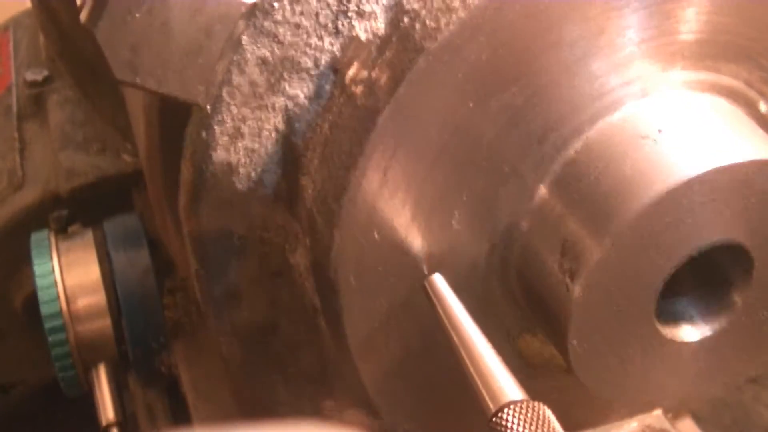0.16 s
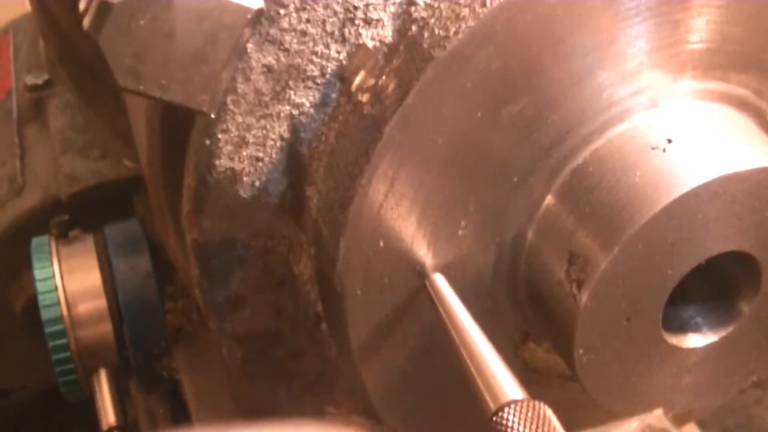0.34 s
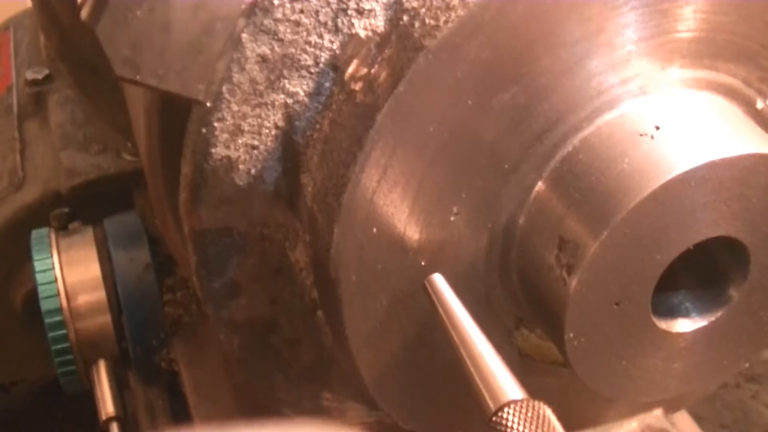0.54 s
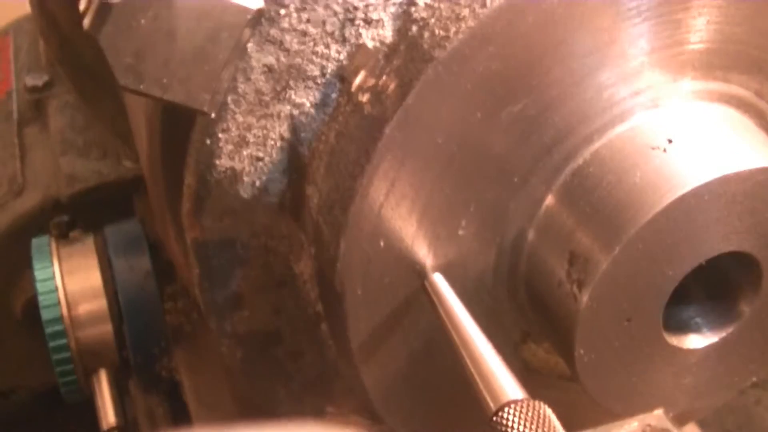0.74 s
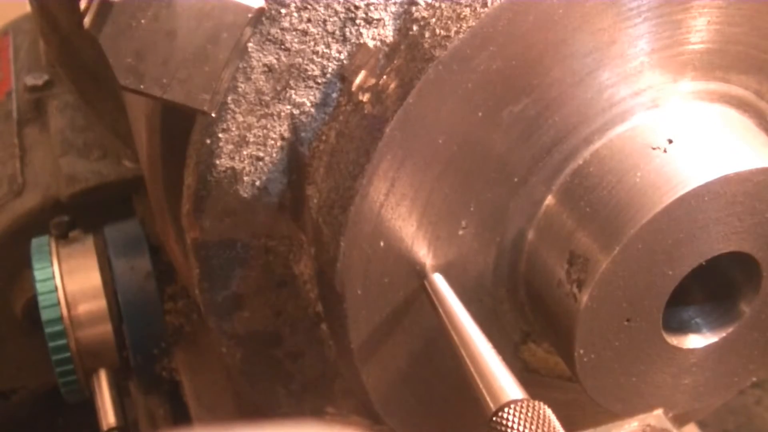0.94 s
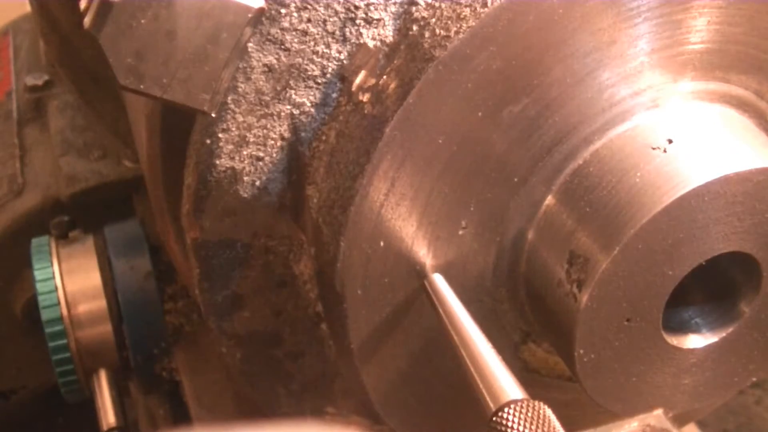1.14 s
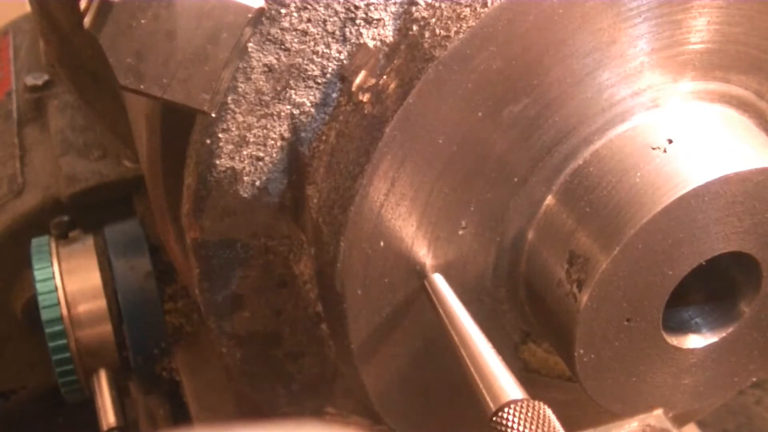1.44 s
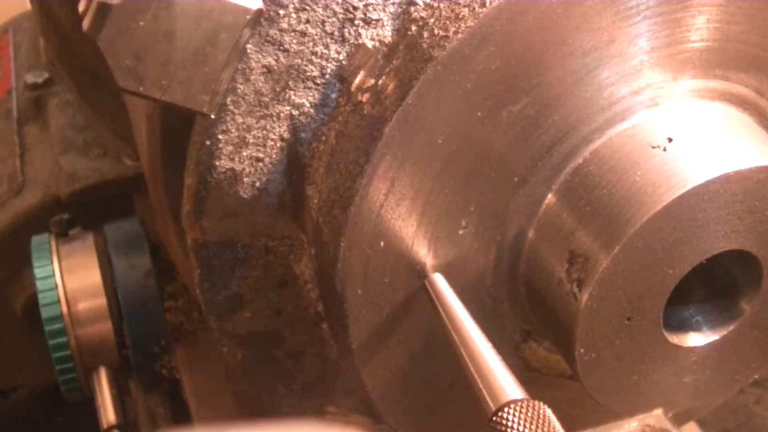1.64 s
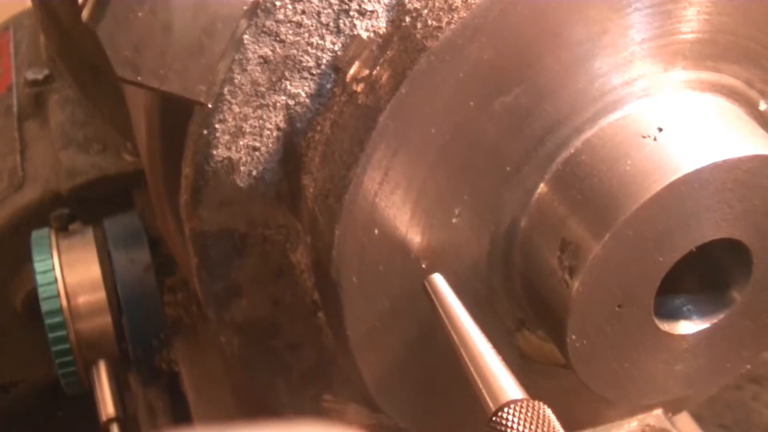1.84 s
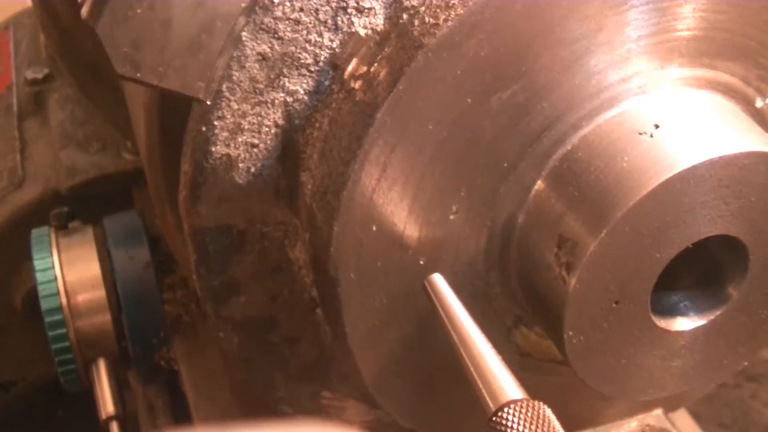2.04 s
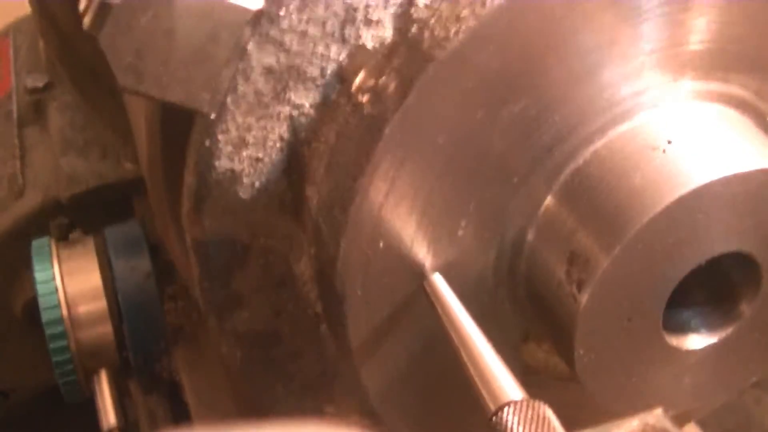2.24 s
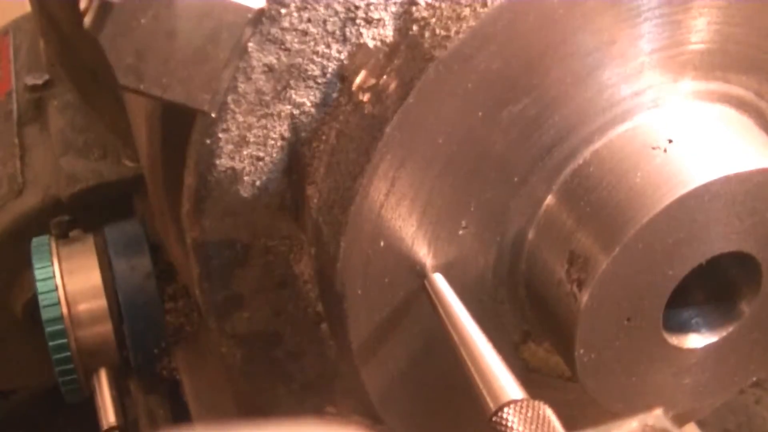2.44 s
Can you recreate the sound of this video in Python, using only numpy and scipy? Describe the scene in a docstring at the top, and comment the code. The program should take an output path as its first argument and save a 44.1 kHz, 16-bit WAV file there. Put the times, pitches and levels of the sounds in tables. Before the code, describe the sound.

Hammer blows on a centre punch set on a steel casting: two about half a second apart, a pause with faint scraping and one tiny clink, then a third; close microphone, small quiet workshop.

```python
"""In a small workshop a centre punch is set on a steel casting held in a machine and struck three times, close by.
The tip's touches are damped noise bursts and its scrape, like the hand's soft rustle, is grainy friction noise.
Each blow chatters as several cracks and modal rings; it thumps the machine, whose low modes swell into a boom.
Dry ticks, all alike, click close to the microphone as short modal rings; the tool clinks once between blows.
Reverberation surrounds the short sounds, and a steady coloured noise is the workshop's quiet air."""
import sys
import numpy as np
from scipy import signal
from scipy.fft import rfft, irfft, next_fast_len
from scipy.io import wavfile

SR = 44100
rng = np.random.default_rng(int(sys.argv[2]) if len(sys.argv) > 2 else 0)


def store_wav(level_fs):
    """Save 16-bit WAV to argv[1]."""
    pcm = np.round(np.clip(np.atleast_2d(level_fs), -1, 1) * 32767)
    wavfile.write(sys.argv[1], SR, pcm.T.astype(np.int16))


N = 114660  # length in samples
T = np.arange(SR // 2) / SR  # time axis of one short sound, in seconds


def amp(db):
    """Logarithmic level: decibels to amplitude gain."""
    return 10 ** (np.asarray(db) / 20)


def unit(x):
    """Normalisation: scale to an rms of 1."""
    return x / np.sqrt(np.mean(x ** 2) + 1e-20)


def fade(t60, t=T):
    """Exponential damping: the level falls by 60 dB in t60 seconds."""
    return np.exp(-np.log(1000) * t / t60)


def along(points, hz):
    """Spectral envelope: interpolate (Hz, value) points on a logarithmic frequency axis."""
    f, v = np.transpose(points)
    return np.interp(np.log(hz + 1), np.log(f + 1), v)


def filtered(x, response):
    """Linear filtering: multiply the zero-padded spectrum of x by a response of frequency."""
    n = x.shape[-1]
    padded = next_fast_len(n + 8192)
    spectrum = rfft(x, padded) * response(np.fft.rfftfreq(padded, 1 / SR))
    return irfft(spectrum, padded)[..., :n]


def noise(response, width, size):
    """Mid-side stereo: coloured noise of rms 1, whose side level sets the width at each frequency."""
    mid, side = filtered(rng.standard_normal((2, size)), response)
    side = filtered(side, lambda hz: amp(along(width, hz)))
    return unit(np.array([mid + side, mid - side]))


def add(track, s, sound):
    """Superposition: mix a sound in at s seconds."""
    i = max(0, round(s * SR))
    track[:, i:i + sound.shape[-1]] += sound[..., :N - i]


# Reverberation time of the workshop. Each row: frequency in Hz, t60 in seconds.
ROOM_T60 = [(60, 0.9), (150, 0.23), (400, 0.42), (1000, .31), (2500, 0.18), (5000, 0.17), (12000, 0.14)]
# Stereo width of the room's answer. Each row: frequency in Hz, side over mid in dB.
ROOM_WIDTH = [(100, -13.5), (300, -24), (1000, -12), (4500, -6), (9000, -3.5)]


def with_room(sound, wet_db):
    """Reverberation: convolve a short sound with noise that decays at its own rate in each band."""
    diffuse = noise(np.ones_like, ROOM_WIDTH, size=len(T))
    hz, t, bands = signal.stft(diffuse, SR, nperseg=256)
    decaying = bands * fade(along(ROOM_T60, hz)[:, None], t)
    tail = signal.istft(decaying, SR, nperseg=256)[1][:, :len(T)]
    tail = tail * (1 - np.exp(-T / 0.0017))  # soft onset
    tail = unit(tail) / np.sqrt(len(T))  # energy 1 in the mean of both channels
    answer = signal.fftconvolve(np.atleast_2d(sound), tail, axes=1)[:, :len(T)]
    return sound + amp(wet_db) * answer


# Spectrum of the air. Each row: frequency in Hz, relative level in dB.
AIR_SPECTRUM = [(15, -49), (25, -10), (119, -1), (209, -7), (722, -14.5), (826, -12), (1270, -16),
                (1570, -15), (1950, -16.5), (4260, -20), (15500, -29.5)]
# Stereo width of the air. Each row: frequency in Hz, side over mid in dB.
AIR_WIDTH = [(40, -12), (150, -4.5), (300, 2), (600, 3), (2000, -0.5), (5000, -2), (12000, -1.5)]
AIR_DB = -54


def quiet_air():
    """Stationary random noise: a fixed spectrum with no events."""
    return amp(AIR_DB) * noise(lambda hz: amp(along(AIR_SPECTRUM, hz)), AIR_WIDTH, size=N)


# The tip scraping and the hand shifting.
# Each row: start of the hold in seconds, length of the hold in seconds, level in dB,
# Gaussian fade scale at both ends in seconds.
RUBS = [(-.02, 0.02, -44.5, 0.058), (0.165, 0.11, -39, 0.0075), (0.423, 0.094, -46, 0.071),
        (0.658, 0.086, -40, 0.012), (1.072, 0.23, -60.5, 0.12), (1.712, 0.17, -48.5, 0.081),
        (2.193, 0.073, -36, 0.015), (2.552, .09, -50.5, 0.12)]
# Spectrum of the friction. Each row: frequency in Hz, relative level in dB.
RUB_SPECTRUM = [(30, 9), (120, -6), (280, 1.5), (520, -4.5), (900, -5), (2200, -6.5), (3600, -10.5),
                (4800, -12), (8000, -18.5), (15000, -34.5)]
# Stereo width of the friction. Each row: frequency in Hz, side over mid in dB.
RUB_WIDTH = [(100, -14), (600, -21), (2000, -8.5), (4500, -10), (9000, 0)]


def rubs(grain_db=2, grain_rate=400):
    """Sliding friction: noise with random grain, grain_rate points a second, fades in, holds and fades out."""
    t = np.arange(N) / SR
    level = np.zeros(N)
    for s, length, db, edge in RUBS:
        outside_hold = np.maximum(abs(t - s - length / 2) - length / 2, 0)
        level += amp(db) * np.exp(-(outside_hold / edge) ** 2)
    grain = np.interp(t * grain_rate, np.arange(N), rng.standard_normal(N))
    friction = noise(lambda hz: amp(along(RUB_SPECTRUM, hz)), RUB_WIDTH, size=N)
    return level * amp(grain_db * grain) * friction


# Jolts of the machine: three blows and a few nudges of the hand.
# Each row: start in seconds, thump level in dB, thump frequency in Hz, boom level in dB.
JOLTS = [(.008, -40.5, 139, -30.5), (.182, -28, 170, -28), (0.2326, 0, 195, 0), (0.4238, -21, 195, -19.5),
         (0.7296, -5.5, 183.6, -1.5), (1.739, -36, 203, -37), (2.198, -20, 196, -19),
         (2.242, -1.5, 179, 1.5), (2.545, -33.5, 198, -23)]
# Low modes of the machine and its stand.
# Each row: frequency in Hz, relative level in dB, t60 in seconds, rise time in seconds.
MACHINE_MODES = [(82.3, -39, 0.44, .02), (122.8, 4, 0.2, .07), (180.6, -18, 0.26, 0.015),
                 (235, -24, 0.11, 0.0032), (259.6, -28.5, 0.44, 0.015), (290, -20.5, 0.12, 0.0027),
                 (332, -25.5, 0.2, 0.023), (385.5, -26, 0.19, 0.0028)]
THUMP_WIDTH_S, THUMP_ROOM_DB = 0.0025, -8.5
BOOM_SWELL = 3.5  # steepness with which the low modes build up


def thumps():
    """Impulse and resonance: each jolt shoves the machine once and leaves its low modes booming."""
    out = np.zeros((2, N))
    lead_s = 3 * THUMP_WIDTH_S  # the push peaks this long after its first sample
    boom = np.zeros(len(T))
    for f, level, t60, rise in MACHINE_MODES:
        swell = 1 - np.exp(-(T / rise) ** BOOM_SWELL)
        boom += amp(level) * np.sin(2 * np.pi * f * T) * fade(t60) * swell
    for s, db, hz, boom_db in JOLTS:
        pulse = np.exp(-((T - lead_s) / THUMP_WIDTH_S) ** 2)
        push = -amp(db) * np.cos(2 * np.pi * hz * (T - lead_s)) * pulse
        add(out, s - lead_s, with_room(push, THUMP_ROOM_DB))
        add(out, s, amp(boom_db) * boom)
    return out


# Dry ticks close to the microphone. Each row: start in seconds, level relative to TICK_DB in dB.
TICKS = [(0.0386, -11.5), (0.0675, -16), (0.2594, 8.5), (0.2974, 1), (0.3385, -2.5), (0.3681, -1),
         (0.3926, -9.5), (0.4437, -1), (0.475, 2), (0.5046, -5.5), (0.5284, -7.5), (0.5535, -7),
         (0.5817, -9), (0.7073, 3), (0.757, 6), (0.7981, -4), (.836, 1), (.8661, -3), (0.891, -11.5),
         (0.9429, -15), (0.9704, -17.5), (2.2704, 3), (2.3206, 0.5), (2.3523, 1.5), (2.3784, -4),
         (2.4032, -3), (2.428, -5.5), (2.456, -11.5)]
# Modes of the tick before the band-pass.
# Each row: frequency in Hz, relative level in dB, t60 in seconds.
TICK_MODES = [(1510, -15, 0.023), (1825, -10, 0.022), (2214, -16, 0.054), (2576, -15.5, 0.028),
              (2884, -6.5, 0.0088), (3700, -7, 0.0052)]
TICK_DB, TICK_ROOM_DB, TICK_BAND_HZ = -19, -15, (1256, 3760)
TICK_PAN_DB = -4  # left over right, before the balance of the near sounds


def ticks():
    """Modal ringing: one band-limited tick of damped modes returns unchanged, only stronger or weaker."""
    out = np.zeros((2, N))
    ring = sum(amp(db) * np.cos(2 * np.pi * hz * T) * fade(t60) for hz, db, t60 in TICK_MODES)
    band_pass = signal.butter(6, TICK_BAND_HZ, "bandpass", fs=SR, output="sos")
    tick = signal.sosfilt(band_pass, ring)
    for s, db in TICKS:
        add(out, s, amp(TICK_DB + db) * with_room(tick, TICK_ROOM_DB))
    return out * amp(TICK_PAN_DB * np.array([[.5], [-.5]]))


# Light touches of the tip and fingers. Each row: start in seconds, level in dB,
# centre frequency in Hz, bandwidth scale in octaves, t60 in seconds.
TOUCHES = [(0.164, -27, 2970, 0.76, 0.02), (.165, -32.5, 272, 0.66, 0.21), (.173, -21.5, 800, 0.67, 0.054),
           (.186, -27, 990, 0.23, 0.036), (.217, -27, 930, 0.31, 0.099), (0.306, -33, 2190, .8, 0.022),
           (0.4162, -33.5, 2600, 1.45, 0.024), (.424, -28, 264, 0.65, 0.099), (0.428, -35, 1430, 1.5, 0.11),
           (.622, -42, 830, 0.68, 0.072), (.652, -23, 2700, 0.51, 0.014), (.654, -33, 450, 1.6, 0.24),
           (.667, -20, 868, 0.43, 0.041), (1.185, -37.5, 2800, 1.35, 0.011),
           (1.339, -49.5, 420, 0.6, 0.055), (1.628, -35.5, 5900, 0.85, 0.0079),
           (1.651, -42, 7000, 0.55, .02), (1.674, -39, 920, .5, 0.035), (1.729, -43.5, 900, 0.65, 0.03),
           (1.946, -51, 6900, 0.52, 0.092), (2.182, -31.5, 1820, 0.62, 0.044),
           (2.185, -25, 282, 0.48, 0.11), (2.191, -25, 790, 0.46, 0.069), (2.201, -32, 1040, 0.29, 0.047),
           (2.292, -36, 4470, .7, 0.028), (2.304, -34, 2490, 1, 0.027), (2.537, -42.5, 405, 1.7, .1),
           (2.57, -40, 220, 2.6, 0.091), (2.588, -50.5, 5900, 0.79, 0.068)]
# Stereo width of touches and cracks. Each row: frequency in Hz, side over mid in dB.
NEAR_WIDTH = [(60, -16), (200, -13), (500, -12), (1100, -12.5), (2200, -12), (4500, -7), (9000, -2.5),
              (14000, -2)]


def touches():
    """Damped impact: small knocks of band-limited noise as the punch is handled and set down."""
    out = np.zeros((2, N))
    for s, db, centre_hz, octaves, t60 in TOUCHES:
        band = lambda hz: 1 / (1 + (np.log2((hz + 1) / centre_hz) / octaves) ** 2) ** 1.79
        onset = 1 - np.exp(-T / 0.00038)
        knock = noise(band, NEAR_WIDTH, size=len(T)) * fade(t60) * onset
        add(out, s, amp(db) * with_room(knock, wet_db=-12.5))
    return out


# Metal contacts within the blows. Each row: start in seconds, level in dB,
# spectral tilt in dB per octave, most excited frequency in Hz.
CONTACTS = [(0.2267, -20.5, 3, 5500), (.2300, -13, -4, 2500), (0.2333, -6.5, -1, 4660),
            (0.2391, -18.5, 3, 2515), (0.2398, -12.5, -1.5, 1390), (0.2435, -15, -0.5, 4710),
            (0.2756, -24, -3, 5370), (.7240, -18, 2, 1000), (.7268, -9, -2.5, 2570), (0.7303, -9, 0, 1105),
            (.7324, -11.5, 0, 2420), (0.7349, -12, 0.5, 1330), (0.7378, -9.5, 1, 4440),
            (0.8052, -36.5, 1, 4810), (2.2373, -19, 4.5, 5900), (2.2387, -3.5, -4.5, 2220),
            (2.245, -18, 4, 4640), (2.2483, -9.5, -4.5, 2000), (2.2517, -12, -2, 4440),
            (2.2716, -22, -1, 2740)]
# Nominal modes of punch and casting. Each row: frequency in Hz, relative level in dB, t60 in seconds.
STEEL_MODES = [(517, -14.5, 0.17), (639, -19, 0.29), (799, -22, 0.15), (900, 2, 0.027), (1006, -0.5, 0.054),
               (1296.5, 0, 0.058), (1486, -4, 0.052), (1710, -6.5, 0.045), (2030, -24, 0.019),
               (2375, 1, 0.022), (2677, -1, 0.036), (3160, -4, 0.02), (4190, -8, 0.067), (4516, -6, 0.032)]
# Spectrum of the crack. Each row: frequency in Hz, relative level in dB.
CRACK_SPECTRUM = [(100, -15.5), (400, 2.5), (1300, 1), (2500, 0), (3400, -7), (5000, -8.5), (7000, -14.5),
                  (10200, -14.5), (12000, -25.5), (15500, -31)]
RING_DB, CRACK_DB, CRACK_T60_S, CHATTER_ROOM_DB = -18.5, -0.5, 0.015, -10.5
EMPHASIS_DB, EMPHASIS_OCTAVES = 8.5, 0.3


def chatter():
    """Repeated collision: steel meets steel several times a blow, each contact exciting its own range."""
    out = np.zeros((2, N))
    for s, db, tilt, centre_hz in CONTACTS:
        distance = lambda hz: np.log2((hz + 1) / centre_hz) / EMPHASIS_OCTAVES
        emphasis = lambda hz: EMPHASIS_DB * np.exp(-distance(hz) ** 2)
        slope = lambda hz: tilt * np.log2(np.clip(hz, 500, 9000) / 2000)
        colour = lambda hz: amp(slope(hz) + emphasis(hz))
        spectrum = lambda hz: amp(along(CRACK_SPECTRUM, hz)) * colour(hz)
        crack = noise(spectrum, NEAR_WIDTH, size=len(T)) * fade(CRACK_T60_S)
        ring = np.zeros((2, len(T)))
        for f, level, t60 in STEEL_MODES:
            # each contact varies level per channel, pitch and phase
            gain = amp(level + rng.normal(0, 1, (2, 1))) * colour(f)
            cycles = f * rng.normal(1, 0.0057) * T + rng.random()
            ring += gain * fade(t60) * np.sin(2 * np.pi * cycles)
        onset = 1 - np.exp(-T / 0.00013)
        hit = (amp(CRACK_DB) * crack + amp(RING_DB) * ring) * onset
        add(out, s, amp(db) * with_room(hit, CHATTER_ROOM_DB))
    return out


# Modes of the tool's clink. Each row: frequency in Hz, relative level in dB, t60 in seconds.
CLINK_MODES = [(1420, -16, 0.071), (1790, -8, 0.046), (3540, 3.5, 0.023), (4980, -5, 0.026),
               (5500, -10, .025)]
CLINK_S, CLINK_DB = 1.427, -42.5


def clink():
    """Free vibration: the tool clinks once, lightly, as a sum of damped modes."""
    out = np.zeros((2, N))
    ring = sum(amp(db) * np.sin(2 * np.pi * hz * T) * fade(t60) for hz, db, t60 in CLINK_MODES)
    add(out, CLINK_S, amp(CLINK_DB) * with_room(ring, wet_db=-30))
    return out


# Stereo balance of the near sounds. Each row: frequency in Hz, left over right in dB.
BALANCE = [(100, 1.5), (200, 1), (380, 4.5), (700, -0.5), (1300, 3.5), (2400, -4), (4400, 1.1), (12000, 0)]


def scene():
    """Superposition: near sounds with an interchannel level difference, plus friction and air."""
    air, friction = quiet_air(), rubs()
    near = thumps() + ticks() + touches() + chatter() + clink()
    balance = lambda hz: amp(along(BALANCE, hz) * np.array([[.5], [-.5]]))
    return filtered(near, balance) + friction + air


LOW_CUT_HZ, TOP_HZ = 98, 15900


def record(dry):
    """Band limiting and saturation: thin the deep bass, round off the highest peaks, cut the top."""
    high_pass = signal.butter(1, LOW_CUT_HZ, "highpass", fs=SR, output="sos")
    thinned = signal.sosfilt(high_pass, dry)
    limited = thinned / (1 + np.abs(thinned) ** 8) ** (1 / 8)
    return filtered(limited, lambda hz: hz < TOP_HZ)


dry = scene()
out = record(dry)
store_wav(out)
```